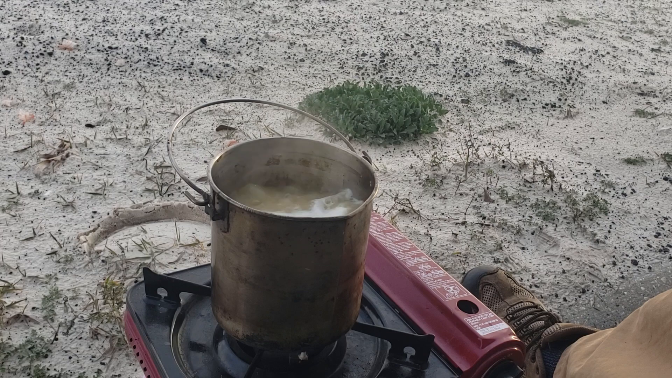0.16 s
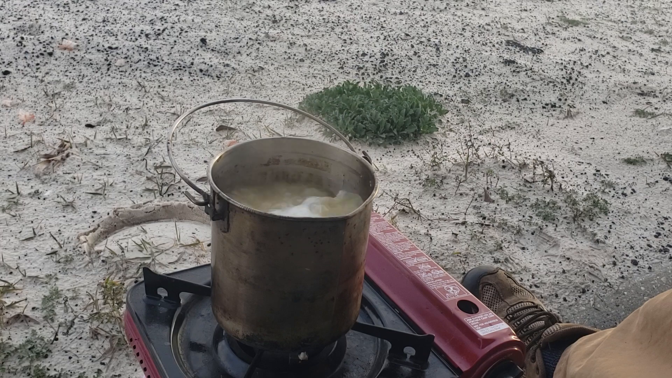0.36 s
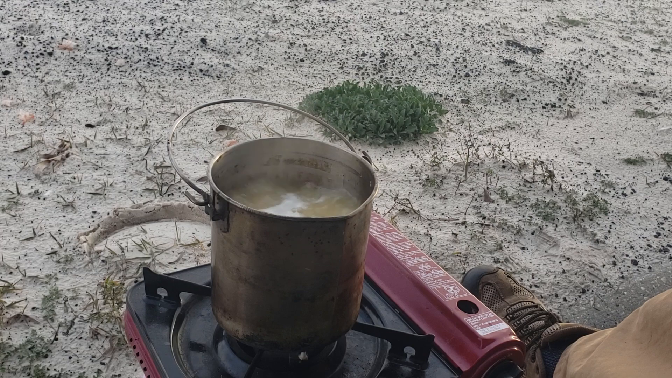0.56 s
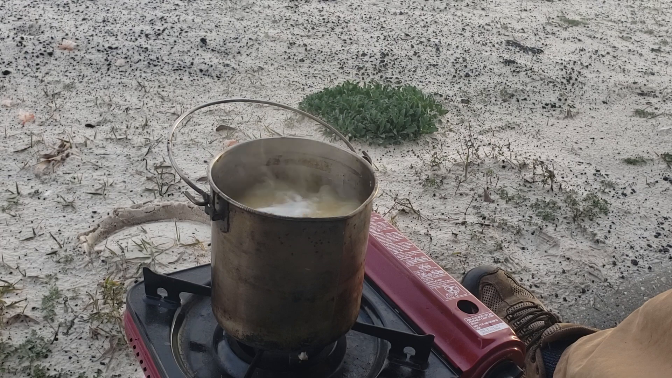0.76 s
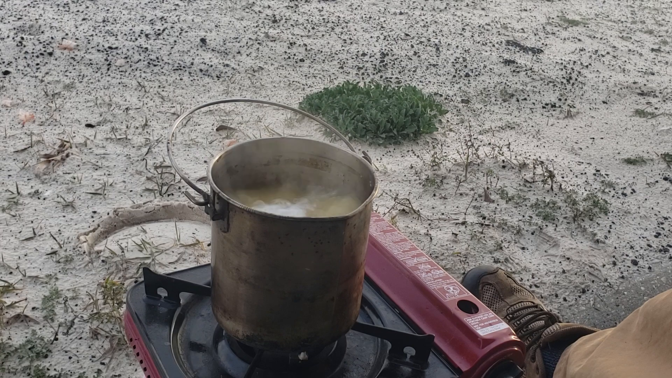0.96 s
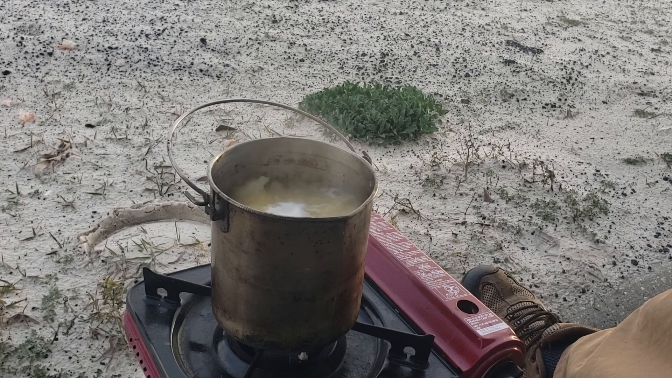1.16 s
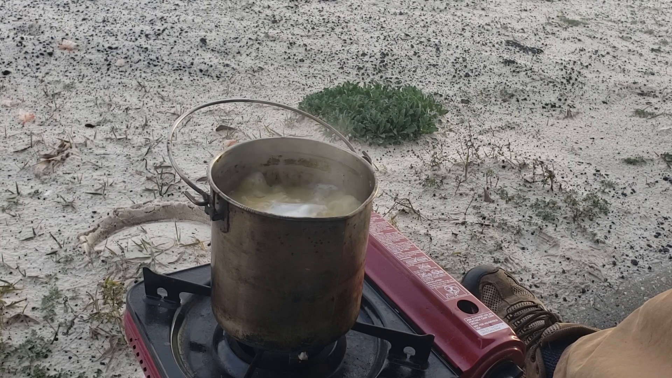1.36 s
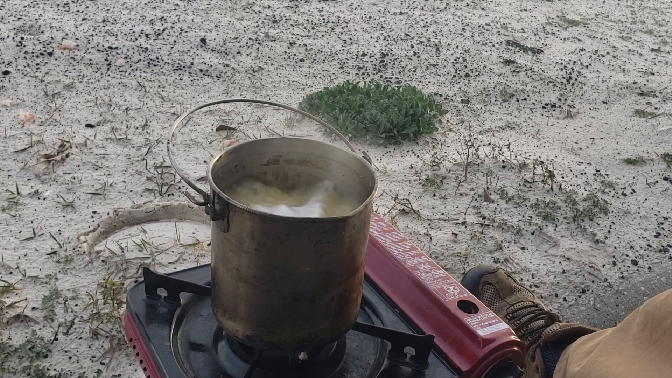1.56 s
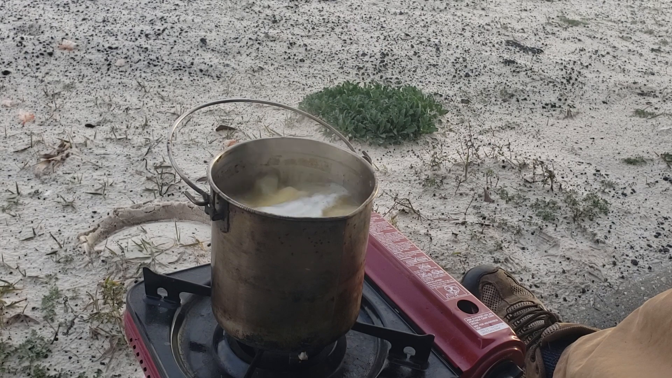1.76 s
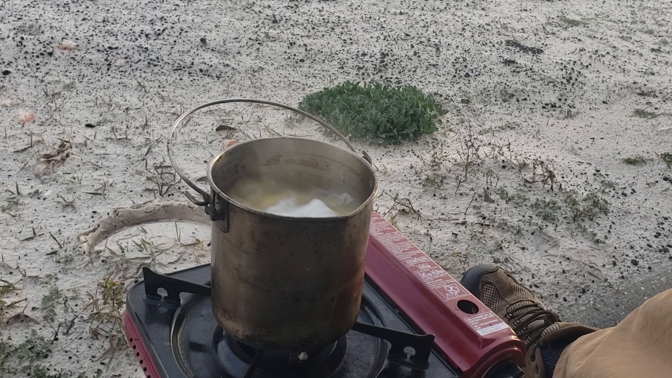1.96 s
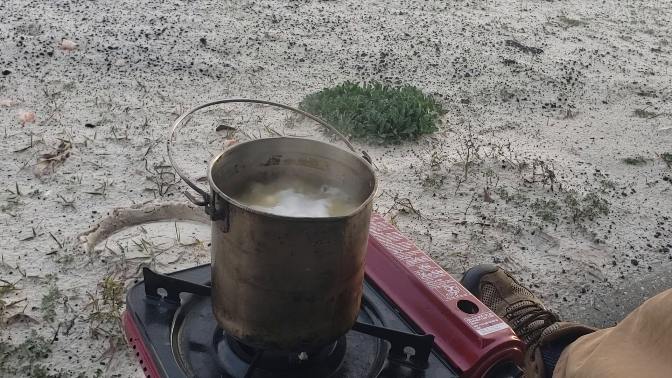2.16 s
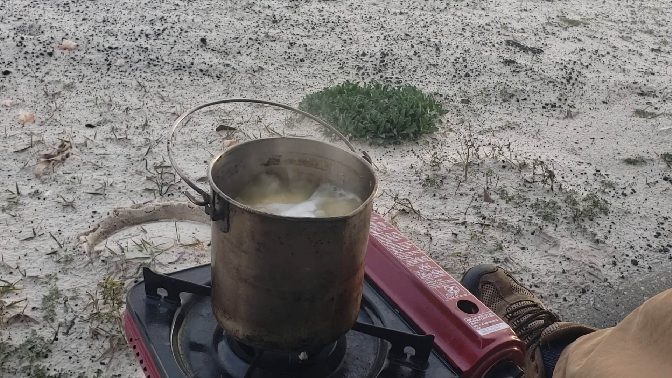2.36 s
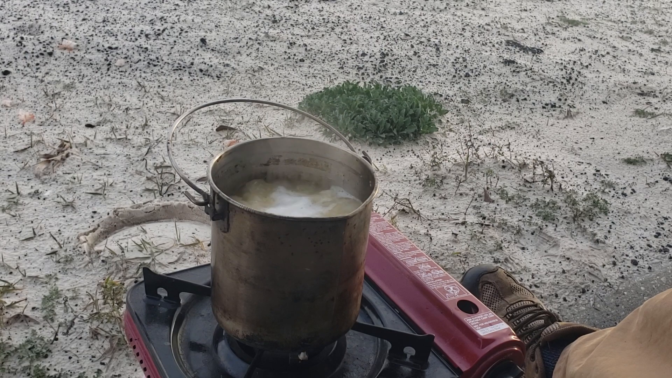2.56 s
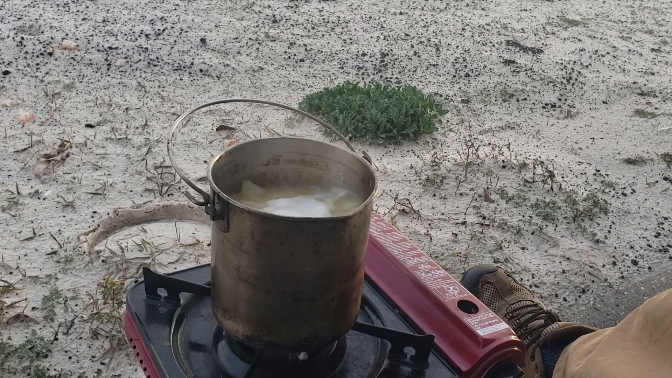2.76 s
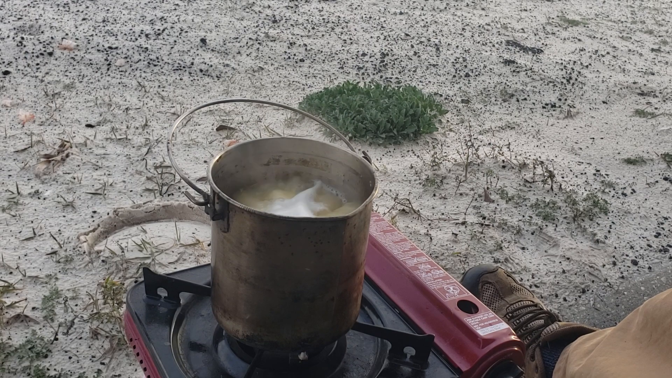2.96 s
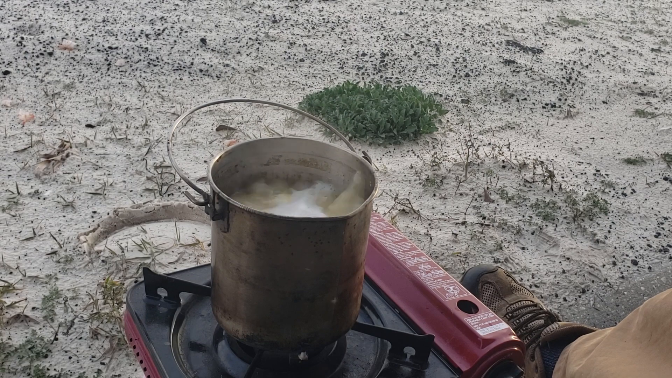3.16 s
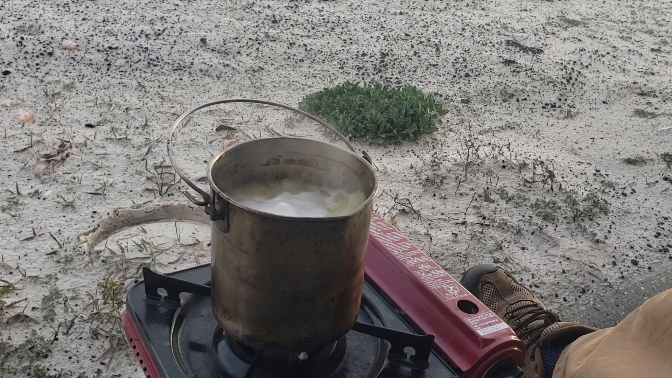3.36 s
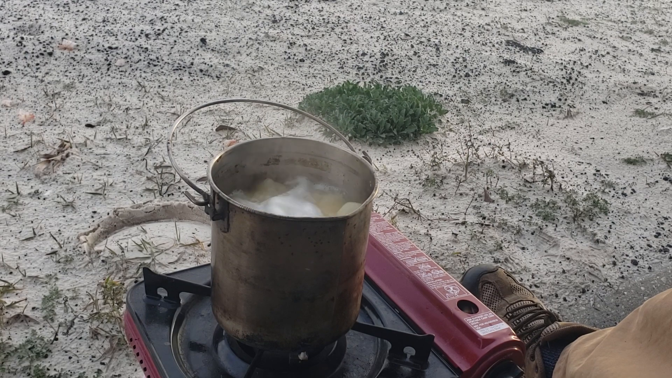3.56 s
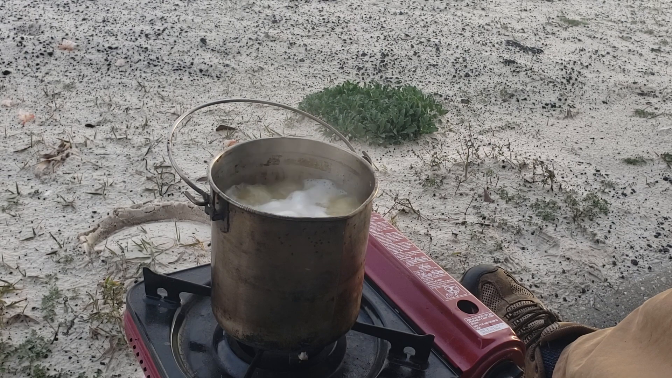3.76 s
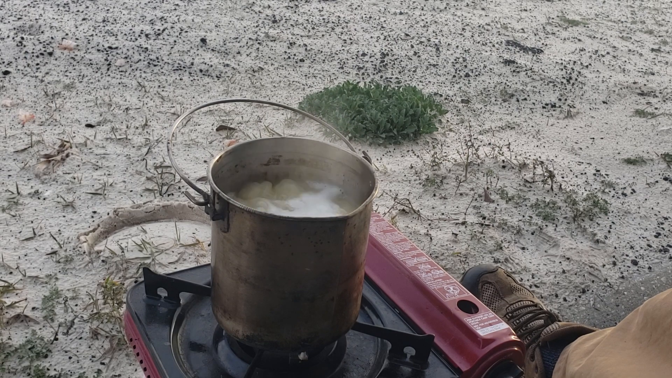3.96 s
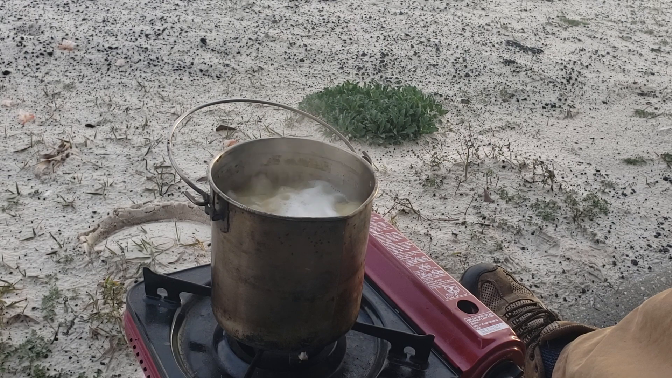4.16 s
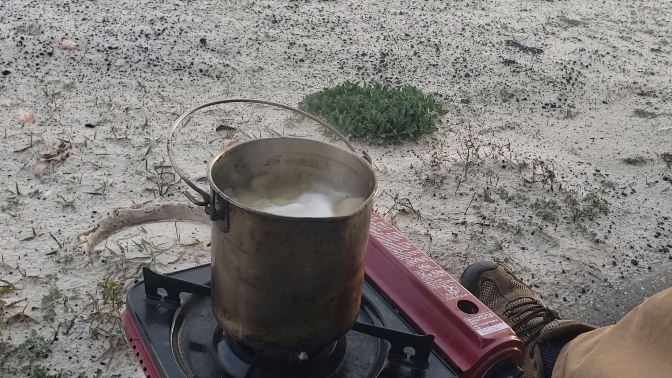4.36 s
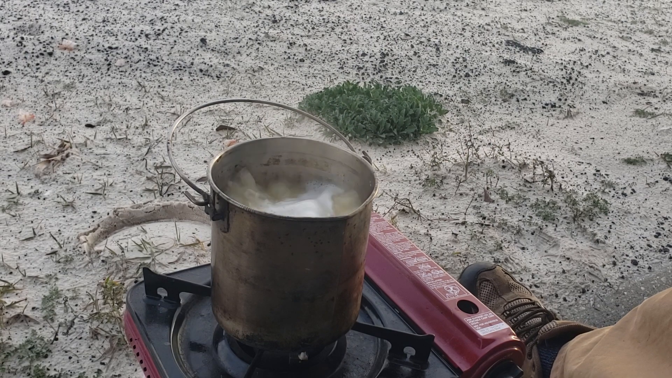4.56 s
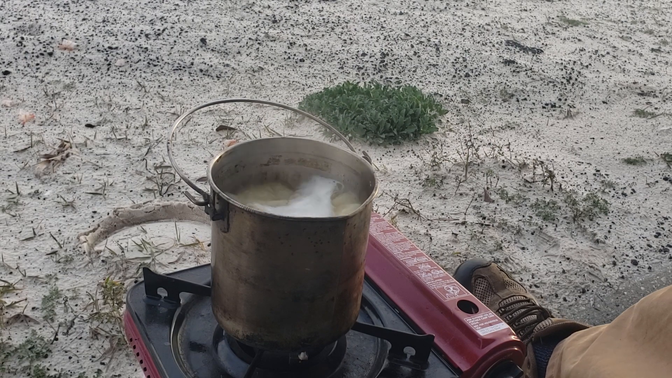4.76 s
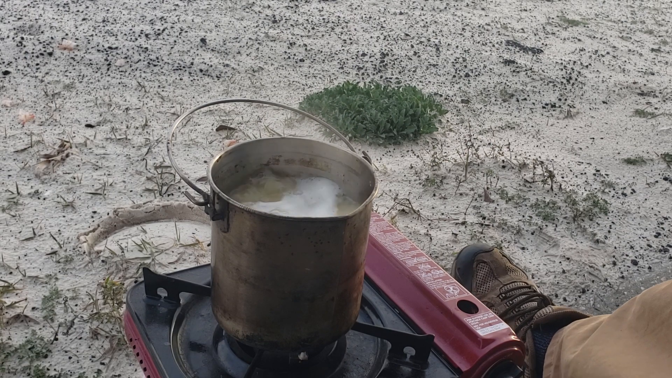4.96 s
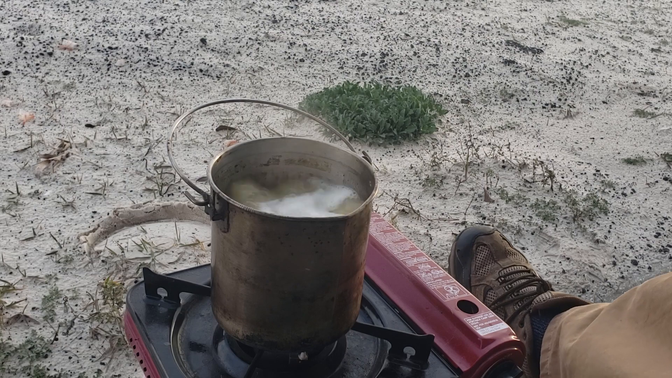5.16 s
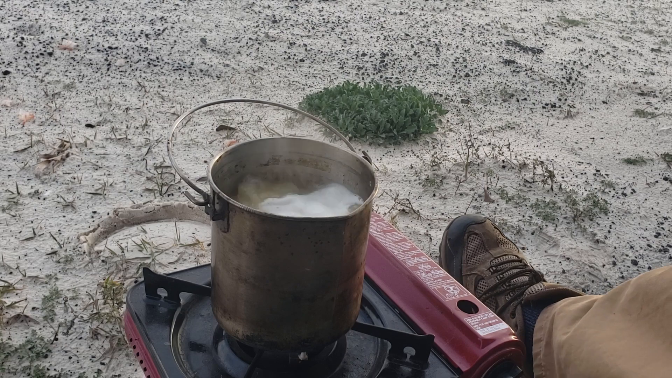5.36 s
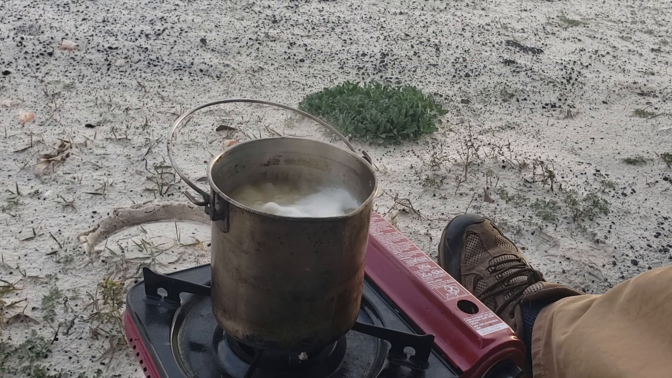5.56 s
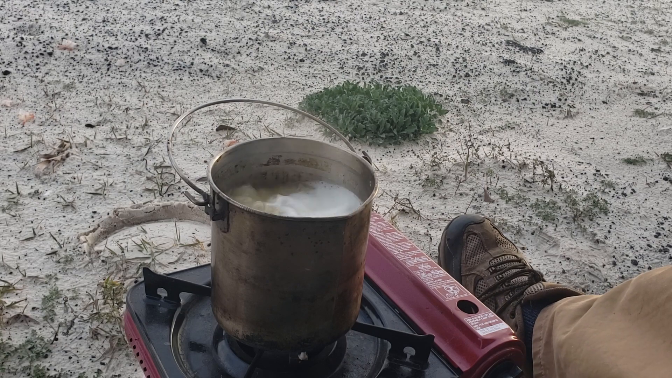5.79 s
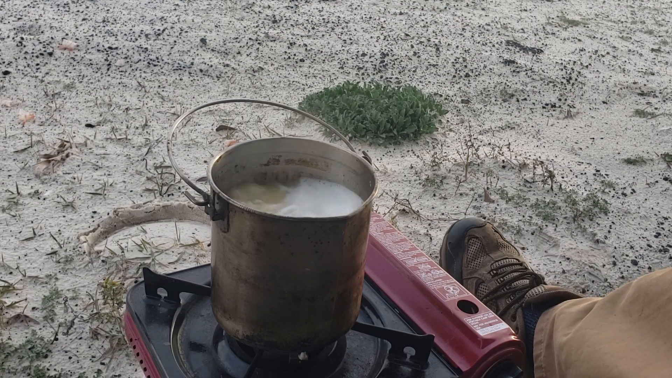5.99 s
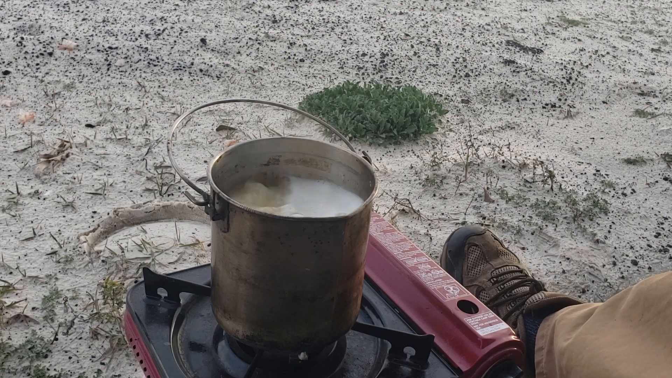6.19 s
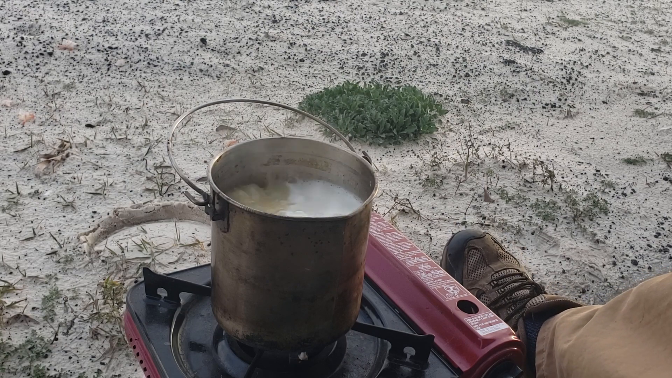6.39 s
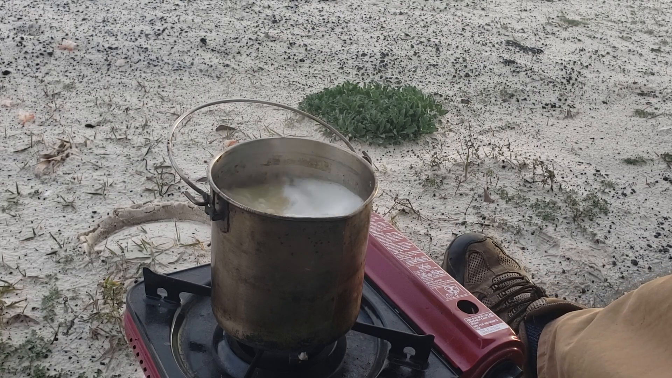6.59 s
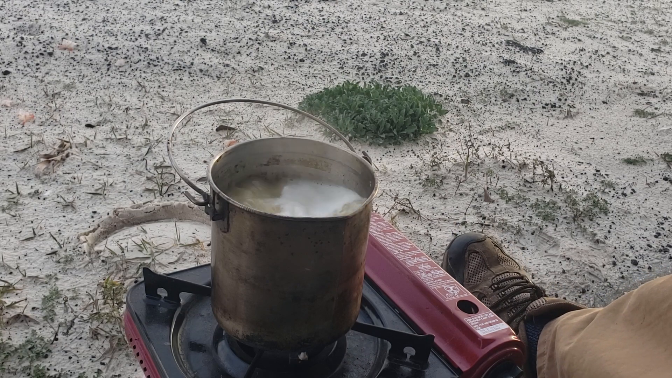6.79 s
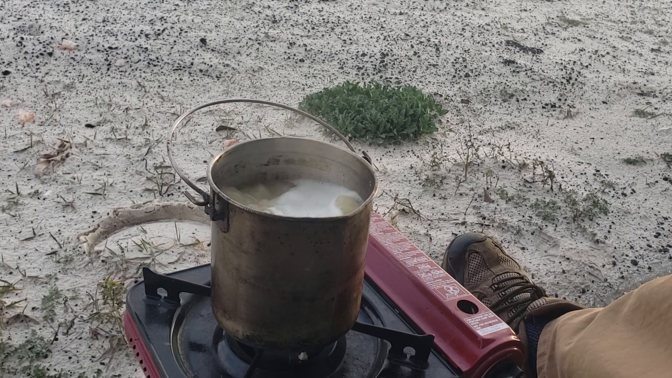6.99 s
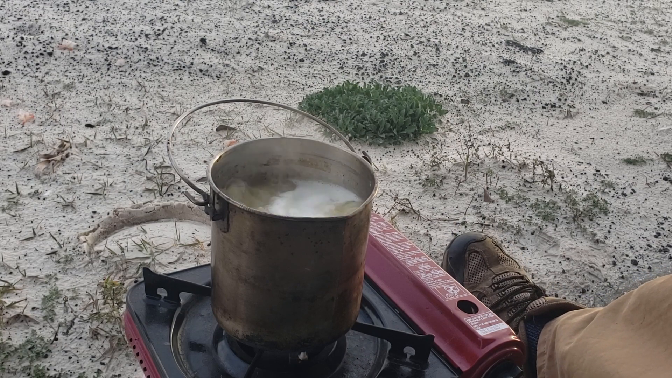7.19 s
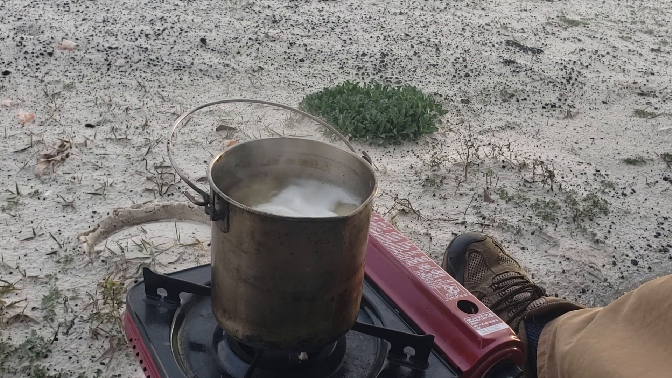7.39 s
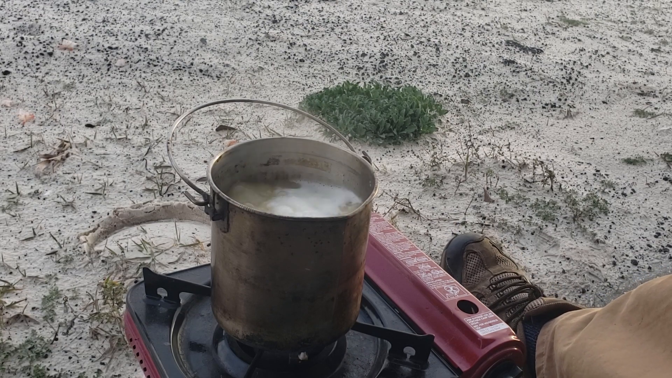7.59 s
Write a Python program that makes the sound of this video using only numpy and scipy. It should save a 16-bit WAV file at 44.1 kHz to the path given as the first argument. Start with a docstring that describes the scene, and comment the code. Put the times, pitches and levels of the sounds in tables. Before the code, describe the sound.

Steady burner rumble with a growing deep hum and faint hiss, bubbling water fizzing in surges, then brief sandy shoe scuffs and small ticks.

```python
"""A portable gas stove burns under a pot of boiling water, outdoors on sand.
Flame: a low roar of shaped noise, a throbbing hum of gliding harmonics, hiss and resonances.
Water: coloured grains churn and fizz in surges, decaying sines plop; a narrow band of noise swells once.
Later a boot pushes over the sand (dense grains), ticks crack (noise bursts) and a thin squeak arches."""
import sys
import numpy as np
from scipy import signal
from scipy.fft import rfft, irfft
from scipy.io import wavfile
from scipy.ndimage import uniform_filter1d

SR = 44100
rng = np.random.default_rng(int(sys.argv[2]) if len(sys.argv) > 2 else 0)


def inscribe(sig):
    """Save sig as 16-bit PCM at rate SR to the path in sys.argv[1].

    A 1-D sig is mono; a 2-D sig holds one channel per row.
    Samples are clipped to [-1, 1] before scaling.
    """
    pcm = np.round(np.clip(np.atleast_2d(sig).T, -1, 1) * 32767)
    wavfile.write(sys.argv[1], SR, pcm.astype(np.int16))


N = 336483
TIME_S = np.arange(N) / SR
BINS_HZ = np.maximum(np.arange(N // 2 + 1) * SR / N, 1)

# left-right correlation of the flame's turbulence: f/Hz, correlation (0-1)
FLAME_LIKENESS = [(90, 1), (200, 0.93), (300, 0.41), (500, 0.91), (900, 0)]


def from_db(db):
    """Decibels to amplitude gain."""
    return 10 ** (np.asarray(db) / 20)


def rms_one(x):
    """Scale to an rms of 1 over all channels."""
    return x / np.sqrt(np.mean(x ** 2) + 1e-20)


def in_time(rows):
    """Each value column of a time curve, interpolated at every sample."""
    s, *columns = np.transpose(rows)
    return [np.interp(TIME_S, s, column) for column in columns]


def over_hz(rows):
    """Each value column of a spectrum, interpolated over log frequency."""
    hz, *columns = np.transpose(rows)
    return np.array([np.interp(np.log(BINS_HZ), np.log(hz), column) for column in columns])


def colour(x, spectrum):
    """Filter by a magnitude spectrum in dB; rms 1."""
    return rms_one(irfft(rfft(x) * from_db(over_hz(spectrum)), N))


def pan(left_db):
    """Left and right gains for a level difference, left over right."""
    return from_db(np.array([[.5], [-.5]]) * left_db)


def blend(pair, likeness, lead_rad=0):
    """Correlate two independent sounds per frequency; advance the left phase."""
    mid, side = rfft(pair)
    alike = np.clip(over_hz(likeness)[0], 0, 1)
    mid = mid * np.sqrt(1 + alike)
    side = side * np.sqrt(1 - alike)
    left = (mid + side) * np.exp(1j * lead_rad)
    return irfft(np.array([left, mid - side]), N)


def resonant_noise(hz, width_hz):
    """White noise through one second-order resonance; rms 1."""
    white = rng.standard_normal(2 * len(BINS_HZ)).view(complex)
    detuning = (BINS_HZ - hz * hz / BINS_HZ) / width_hz
    return rms_one(irfft(white / (1 + 1j * detuning), N))


def drift(corner_hz):
    """Low-passed random modulation; rms 1."""
    spectrum = rfft(rng.standard_normal(N))
    return rms_one(irfft(spectrum / (1 + (BINS_HZ / corner_hz) ** 2), N))


def grains(per_s, spread_db):
    """Independent left and right random clicks of uneven size and random sign."""
    sizes = from_db(spread_db * np.minimum(rng.exponential(1, (2, N)), 4))
    signs = rng.choice([-1, 1], (2, N))
    return sizes * signs * (rng.random((2, N)) < per_s / SR)


def add(out, s, sound):
    """Mix a short stereo sound in at time s."""
    start = max(int(s * SR), 0)
    part = out[:, start:start + sound.shape[1]]
    part += sound[:, :part.shape[1]]


def bump(s, length_s):
    """Gaussian peak of 1 at time s; above half for length_s."""
    return np.exp2(-np.minimum((2 * (TIME_S - s) / length_s) ** 2, 60))


def surges(rows, rest_db):
    """Gain of a steady activity plus surges; their powers add."""
    power = sum((from_db(db) * bump(s, length_s)) ** 2 for s, length_s, db in rows)
    return np.sqrt(from_db(rest_db) ** 2 + power)


def nearby_echoes(x, strength=0.14, nearest_s=0.0016, farthest_s=.008, count=6):
    """Ground, stove and leg throw a few early reflections to each side; rms 1."""
    lags = (rng.uniform(nearest_s, farthest_s, (2, count)) * SR).astype(int)
    echoes = [sum(np.roll(side, lag) for lag in side_lags) for side, side_lags in zip(x, lags)]
    return rms_one(x + strength * np.array(echoes))


def hum(throb_hz=11.04, throb_width_hz=3.4, throb_db=-52.5, wobble_rad=0.069, flutter_db=-31.5):
    """The flame oscillates under the pot, throbs, and its turbulence pulses on every cycle."""
    # fundamental: t/s, f/Hz
    hum_pitch = [(0, 89), (3.2, 90.82), (3.6, 92.68), (6.5, 92.35), (6.85, 93.94), (7.25, 93.5), (7.63, 85)]
    # strength of the oscillation: t/s, level/dB
    hum_level = [(0.0, -50), (0.33, -41), (0.48, -38), (1.25, -41), (1.5, -38.5), (1.9, -46.5),
                 (2.6, -35.5), (3.77, -36), (3.97, -31.5), (4.55, -33), (5.4, -31), (6.2, -30.5),
                 (6.85, -34.5), (7.25, -33.0), (7.63, -33.5)]
    # harmonics: multiple, level/dB, left-right/dB, left lead/rad
    hum_orders = [(1, -2, -0.6, -0.18), (2, -24.5, -7.5, -0.19), (3, -34, -10.5, -1.15), (4, -42, 0, 0.16)]
    # brief random lifts and dips in the hum's level: t/s, change/dB
    level_jumps = [(.06, -8), (.39, -15), (0.462, 3), (.82, -21), (.90, 6), (1.04, 5), (1.21, -12),
                   (1.55, 0.5), (2.10, 10), (2.19, 7), (2.33, -3), (2.53, 4), (2.63, 4.5), (3.81, -9),
                   (4.38, -3), (7.39, -11)]
    # turbulence shed on each cycle: f/Hz, density/dB per Hz
    flutter = [(150, -16), (290, -1), (335, -7.5), (400, 4.5), (435, -12.5), (480, -1), (620, -12),
               (1000, -13), (2000, -40)]
    (hz,), (level_db,) = in_time(hum_pitch), in_time(hum_level)
    level_db = level_db + sum(db * bump(s, 0.034) for s, db in level_jumps)
    phase = 2 * np.pi * np.cumsum(hz) / SR + wobble_rad * drift(3.3)
    tone = 0
    for multiple, db, left_db, lead_rad in hum_orders:
        start = rng.uniform(0, 2 * np.pi) + np.array([[lead_rad], [0]])
        tone = tone + from_db(db) * pan(left_db) * np.sin(round(multiple) * phase + start)
    turbulence = colour(blend(rng.standard_normal((2, N)), FLAME_LIKENESS), flutter)
    puffs = turbulence * (1 + .5 * np.sin(phase)) * pan(0.1)
    throb = rms_one(uniform_filter1d(resonant_noise(throb_hz, throb_width_hz), size=1500))
    gain = from_db(level_db) + from_db(throb_db) * throb
    return (rms_one(tone) + from_db(flutter_db) * puffs) * gain


def rumble(left_lag_s=0.0002):
    """Turbulent burning: a low roar of shaped noise, slightly earlier on the right."""
    # turbulence of the flame: t/s, level/dB
    roar_level = [(0, -43.5), (.6, -44), (1.5, -42), (2.4, -43), (3.3, -42.5), (4.2, -42.5), (5, -43),
                  (5.8, -45), (6.2, -39.5), (6.5, -46), (6.9, -42), (7.6, -42)]
    # roar spectrum: f/Hz, density/dB per Hz
    roar_colour = [(20, -17), (38, -15), (52, 2), (74, 2), (90, 1), (112, -1.5), (160, -4), (215, -8),
                   (270, -13), (335, -19), (480, -25), (700, -29.5), (1100, -45.5), (3000, -57)]
    lead_rad = -2 * np.pi * BINS_HZ * left_lag_s
    roar = colour(blend(rng.standard_normal((2, N)), FLAME_LIKENESS, lead_rad), roar_colour)
    return from_db(in_time(roar_level)[0]) * roar * pan(-0.65)


def jet(hiss_db=-58.5):
    """Gas leaves the nozzle with a steady hiss and blows the resonances of burner and pot."""
    # hiss spectrum: f/Hz, left density/dB per Hz, right density/dB per Hz
    jet_colour = [(500, -3, -0.5), (1120, -6.5, -8.5), (1650, -5, 0), (2300, -8.5, -9.5), (3150, -2.5, -7),
                  (3400, -13, -12), (4210, -19, -2), (5800, -14, -7), (7560, -9, -7.5), (9650, -15, -28),
                  (11000, -9, -11), (12300, -33, -25), (13700, -15, -14), (15600, -6, -8)]
    # resonances of burner and pot: f/Hz, width/Hz, level/dB, left-right/dB
    jet_modes = [(397, 40, -69.5, -3), (883, 31, -72, 0), (1670, 120, -82, -11.5), (4670, 60, -79.5, -15.5),
                 (4910, 45, -80, -7), (5220, 91, -82, -9), (6785, 40, -77, -13.5), (7850, 65, -78.5, 9),
                 (8380, 29, -78.5, 13), (10140, 110, -87, 10), (10910, 110, -84, 9), (12570, 120, -82, 0),
                 (14600, 170, -81, -1), (15000, 180, -77.5, 6), (15500, 79, -76, 5)]
    hiss = from_db(hiss_db) * nearby_echoes(colour(rng.standard_normal((2, N)), jet_colour))
    for hz, width_hz, db, left_db in jet_modes:
        polarity = [[1], [rng.choice([-1, 1])]]   # each mode radiates in lobes of either sign
        hiss = hiss + from_db(db) * resonant_noise(hz, width_hz) * pan(left_db) * polarity
    return hiss


def boil(churn_gain_db=-2.5, fizz_gain_db=-2.0, surge_db=1.8, splash_db=1.74):
    """Rolling water churns in surges; a mass of tiny bubbles fizzes above it."""
    # churn spectrum: f/Hz, density/dB per Hz
    churn_colour = [(200, -19), (450, -3.5), (650, 0), (880, -2), (1080, -12.5), (1400, -13), (2000, -19),
                    (5000, -36)]
    # fizz spectrum: f/Hz, left density/dB per Hz, right density/dB per Hz
    fizz_colour = [(700, -21, -21), (1400, -21, -4), (1890, -10.5, -2.5), (2100, -2, -7.5),
                   (2430, -3.5, -2.5), (2570, 2, 2.5), (3020, -1, -1), (3280, -0.5, -5), (3400, -9.5, -7),
                   (3950, -10.5, -8), (5900, -26, -25), (14000, -27, -41)]
    # left-right correlation of the fizz: f/Hz, correlation (0-1)
    fizz_likeness = [(1200, 0.18), (2000, 1), (2800, 0.77), (3600, 0.42), (6000, 0.22)]
    # phase lead of the fizz on the left: f/Hz, lead/rad
    fizz_lead = [(1900, 1.2), (2200, 0), (2550, -2), (3000, -2.5), (3550, -5)]
    # water heaves up and rolls over: crest t/s, length/s, level before churn gain/dB
    heaves = [(.92, 0.62, -57), (1.65, 0.56, -59), (3.05, 0.48, -57), (3.65, 0.83, -56), (4.85, 1, -57.5),
              (6.3, .45, -57.5), (6.9, 0.59, -61), (7.63, 0.16, -56)]
    # foam wells up and fizzes away: crest t/s, length/s, level before fizz gain/dB
    foam = [(.85, 0.65, -63.5), (1.46, 0.58, -58.5), (1.78, 0.23, -60), (2.34, 0.68, -58),
            (3.65, 0.57, -67), (4.35, 0.82, -64), (5.3, .6, -69.5), (6.1, 0.88, -64), (6.9, 0.42, -59.5),
            (7.45, 0.53, -61)]
    churn = nearby_echoes(colour(grains(per_s=1400, spread_db=1.0), churn_colour))
    churn = churn * from_db(churn_gain_db + surge_db * drift(22)) * surges(heaves, rest_db=-62.5)
    tiny = blend(grains(per_s=6000, spread_db=3.5), fizz_likeness, over_hz(fizz_lead)[0])
    fizz = colour(tiny, fizz_colour) * from_db(fizz_gain_db + splash_db * drift(25))
    return churn * pan(-0.69) + fizz * surges(foam, rest_db=-78)


def plop(hz, cycles=17.0, rise=0.055, snap=0.53, scatter_rad=0.87):
    """The film snaps and the bubble rings, rising in pitch; the pot's wall scatters its phase."""
    age_s = np.arange(int(cycles / hz * SR)) / SR
    life = age_s * hz / cycles   # 0 to 1
    start = rng.uniform(-scatter_rad, scatter_rad, (2, 1))
    phase = 2 * np.pi * hz * age_s * (1 + rise * life) + start
    crack = snap * signal.lfilter([.5], [1, -.7], rng.standard_normal(phase.shape))
    return (np.sin(phase) + crack) * from_db(-60 * life) * (1 - np.exp(-2 * age_s * hz))


def bubbles(big_gain_db=9.5, small_min_db=-88.5, small_range_db=10.0, low_hz=550, high_hz=2100, count=200):
    """A few big bubbles burst among many smaller ones, stronger on the right."""
    # big bubbles: t/s, level before gain and pan/dB, starting f/Hz
    big_plops = [(.066, -60, 1190), (.818, -67, 920), (1.378, -57, 910), (1.645, -55, 1260),
                 (1.860, -59, 1000), (1.862, -57, 1520), (2.133, -57, 1400), (2.195, -58, 1200),
                 (2.488, -57, 1480), (3.433, -58, 1400), (4.457, -59, 910), (4.678, -51.5, 1290),
                 (4.849, -56, 1680), (5.437, -51.5, 1330), (6.119, -55, 806), (6.266, -56, 920),
                 (6.736, -56, 1250), (6.852, -57, 1690), (7.247, -58, 1370), (7.249, -51, 820),
                 (7.324, -53, 1710)]
    out = np.zeros((2, N))
    for s, db, hz in big_plops:
        add(out, s, from_db(db + big_gain_db) * plop(hz))
    for when, size, pitch in rng.random((count, 3)):
        gain = from_db(small_min_db + small_range_db * size)
        add(out, when * N / SR, gain * plop(low_hz * (high_hz / low_hz) ** pitch))
    return out * pan(-4.0)


def spatter(level_db=-75.0, low_hz=1800, high_hz=13000):
    """Single droplets land on the hot wall and crackle faintly: sparse band-passed clicks."""
    band = signal.butter(1, [low_hz, high_hz], "band", fs=SR, output="sos")
    crackle = signal.sosfilt(band, grains(per_s=60, spread_db=2.0) + 1e-18)
    return from_db(level_db) * nearby_echoes(crackle)


def boot(judder_db=1.25, pivot_hz=6000):
    """Sand grains rub under the sole at each push; where it digs in, the scrape is coarser."""
    # sand spectrum: f/Hz, left density/dB per Hz, right density/dB per Hz
    sand_colour = [(300, -17, 4), (700, -8, 1), (1190, -0.5, 5), (2200, 0, 2), (3400, -2, 2.5),
                   (4700, -4.5, 3.5), (6000, -4, 0.5), (7000, -6, 0), (7700, -2, 3), (8750, -6.5, -5.5),
                   (11500, -3, 2.5), (12700, -4, 0), (14000, -6, 1.5), (15200, -4.5, 3)]
    # pushes: middle t/s, length/s, level/dB, coarseness/dB (cut above the pivot, boost below)
    pushes = [(4.35, 0.67, -59, 2), (4.552, .09, -52.5, -1), (4.631, 0.065, -48.5, -3),
              (4.717, 0.11, -49.5, -1.5), (4.85, 0.15, -49, 1.5), (4.937, 0.13, -55, -3),
              (5.15, 0.92, -58, 4), (5.534, 0.19, -57, 1.5), (6.424, 0.3, -54.5, -2.5), (7.2, 1, -66, -2)]
    sand = colour(grains(per_s=14000, spread_db=2.0), sand_colour)
    fine = signal.sosfilt(signal.butter(1, pivot_hz, "high", fs=SR, output="sos"), sand)
    fine_gain = surges([(s, length_s, db - coarse) for s, length_s, db, coarse in pushes], -np.inf)
    coarse_gain = surges([(s, length_s, db + coarse) for s, length_s, db, coarse in pushes], -np.inf)
    scrape = fine * fine_gain + (sand - fine) * coarse_gain
    return scrape * from_db(judder_db * drift(25))


def ticks(gain_db=1.5, t60_s=0.011, low_hz=3000, high_hz=8500):
    """Spatter and grit tick: band-passed noise bursts with exponential decay."""
    # ticks: t/s, level before gain and filter/dB
    tick_rows = [(4.6124, -49), (4.8044, -50), (5.5483, -46), (6.0374, -47), (6.394, -42), (6.836, -42.5),
                 (7.384, -47)]
    out, age_s = np.zeros((2, N)), TIME_S[:SR // 50]
    for s, db in tick_rows:
        envelope = from_db(db + gain_db - 60 * age_s / t60_s)
        add(out, s, envelope * rng.standard_normal((2, len(age_s))))
    band = signal.butter(2, [low_hz, high_hz], "band", fs=SR, output="sos")
    return signal.sosfilt(band, out + 1e-18)


def narrow_swell(crest_s=6.68, length_s=0.81, hz=2480, width_hz=170, level_db=-65, left_db=0.5):
    """A narrow band of noise near 2.5 kHz swells and fades."""
    band_noise = np.array([resonant_noise(hz, width_hz) for side in range(2)])
    return from_db(level_db) * bump(crest_s, length_s) * band_noise * pan(left_db)


def squeak(sag=.06, waver=0.009):
    """Thin sine whistles arch up and down in pitch and level, stronger on the right."""
    # whistles: top t/s, length/s, top f/Hz, level before pan/dB
    squeaks = [(7.02, .06, 15000, -68), (7.085, 0.074, 8750, -70), (7.095, .13, 10800, -70)]
    out = 0
    for s, length_s, top_hz, db in squeaks:
        arch = bump(s, length_s)
        sagging = 1 - 2 * sag * (1 - arch)   # pitch share lost is sag at half height
        hz = top_hz * sagging * (1 + waver * drift(270))
        out = out + from_db(db) * arch * np.sin(2 * np.pi * np.cumsum(hz) / SR)
    return out * pan(-5.0)


def scene():
    """Stove, pot and boot in the open air."""
    flame = hum() + rumble() + jet()
    water = boil() + bubbles() + spatter()
    return flame + water + boot() + ticks() + narrow_swell() + squeak()


def record(dry, cutoff_hz=15750):
    """A steep elliptic low-pass cuts the top."""
    return signal.sosfilt(signal.ellip(12, .1, 80, cutoff_hz, fs=SR, output="sos"), dry)


dry = scene()
out = record(dry)
inscribe(out)
```